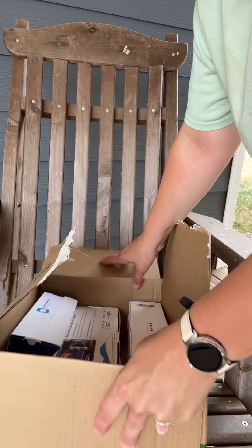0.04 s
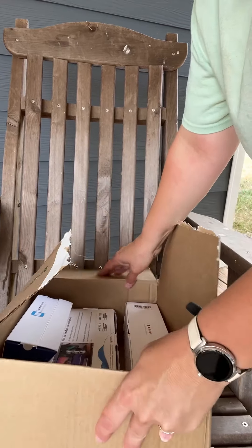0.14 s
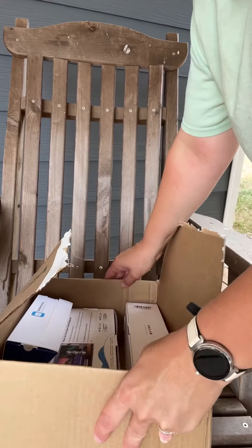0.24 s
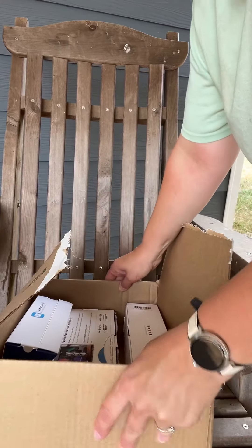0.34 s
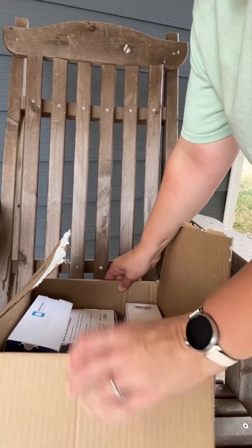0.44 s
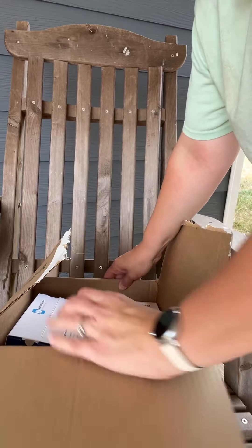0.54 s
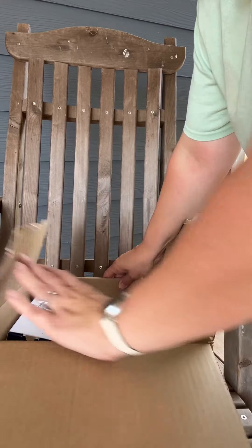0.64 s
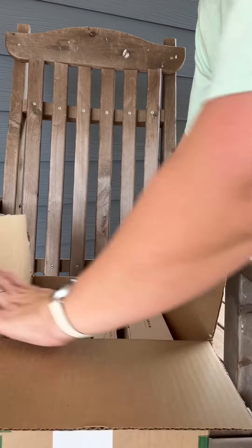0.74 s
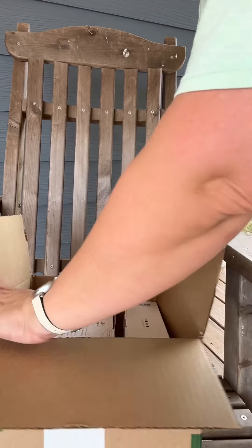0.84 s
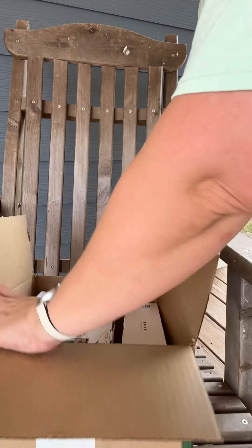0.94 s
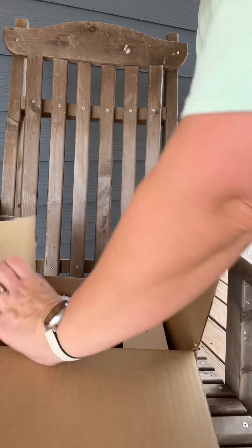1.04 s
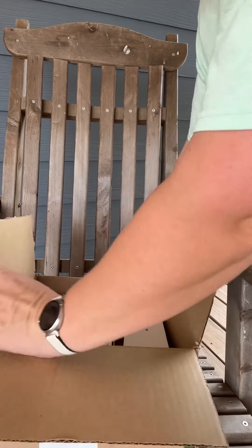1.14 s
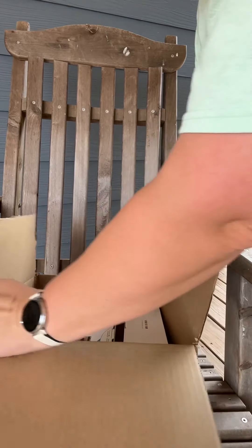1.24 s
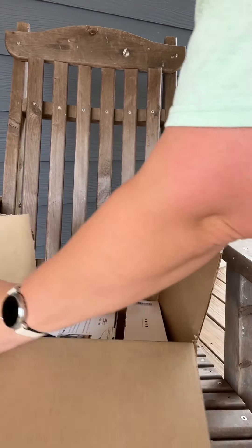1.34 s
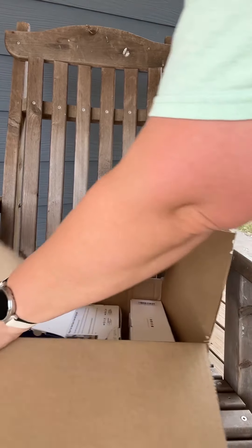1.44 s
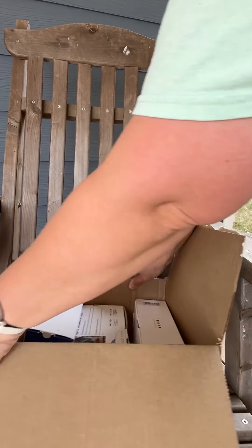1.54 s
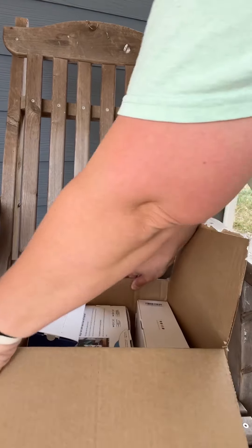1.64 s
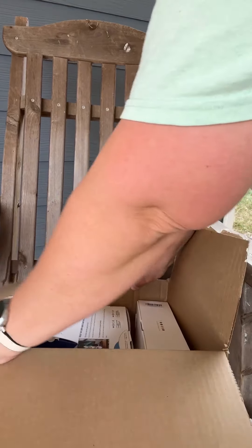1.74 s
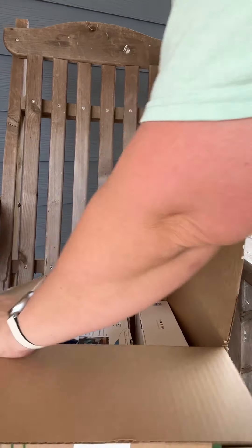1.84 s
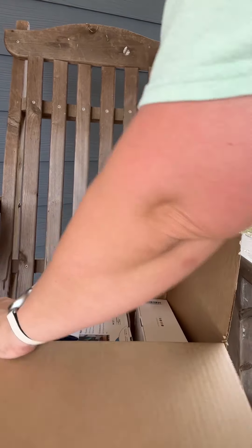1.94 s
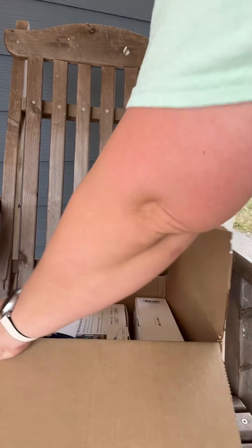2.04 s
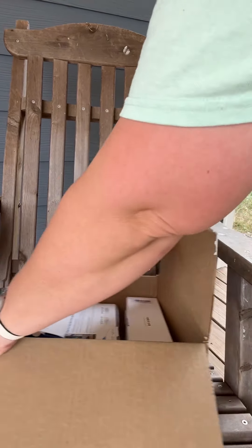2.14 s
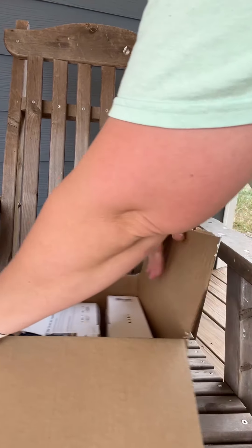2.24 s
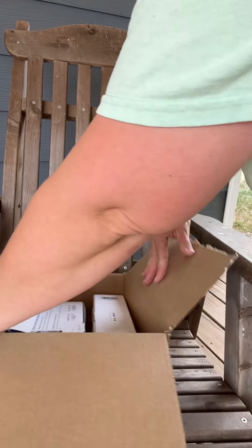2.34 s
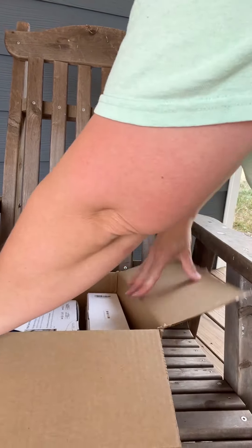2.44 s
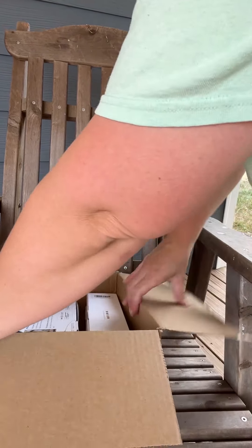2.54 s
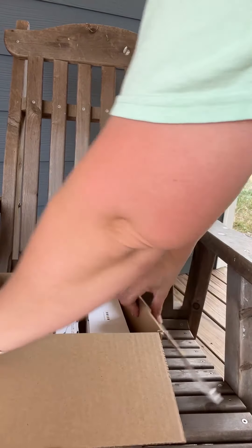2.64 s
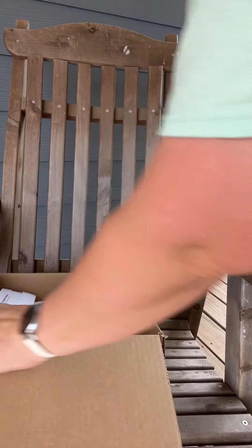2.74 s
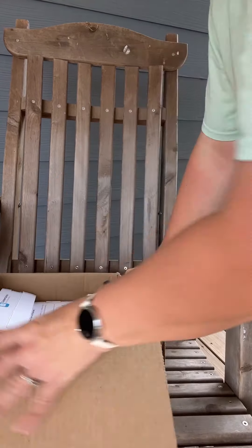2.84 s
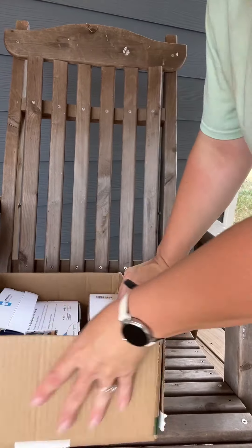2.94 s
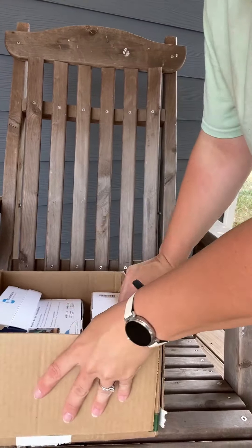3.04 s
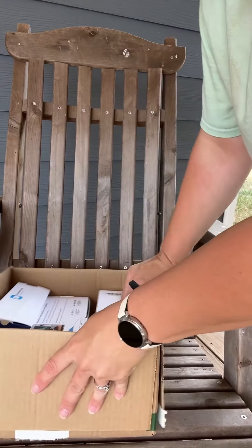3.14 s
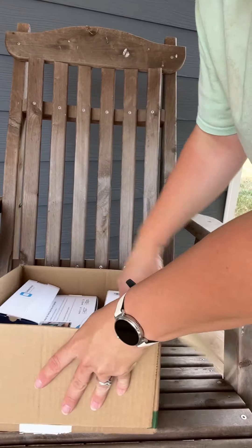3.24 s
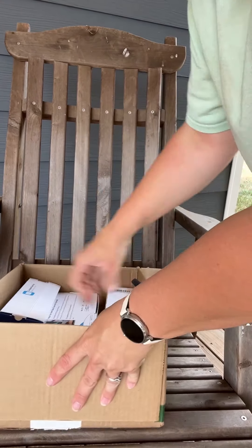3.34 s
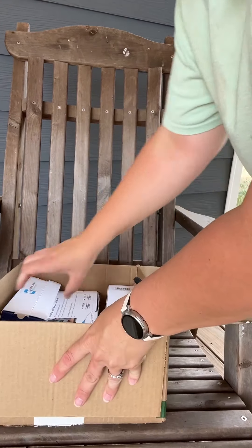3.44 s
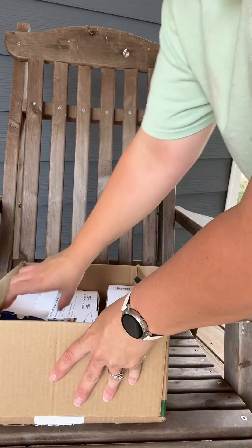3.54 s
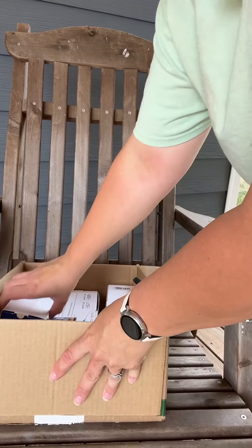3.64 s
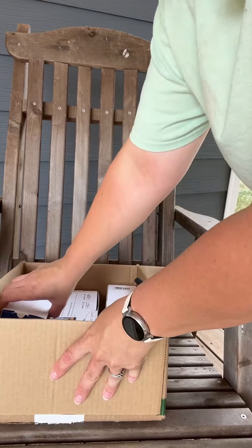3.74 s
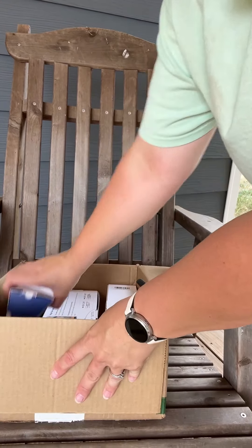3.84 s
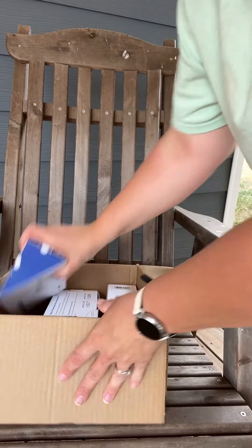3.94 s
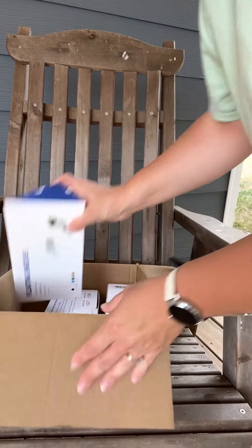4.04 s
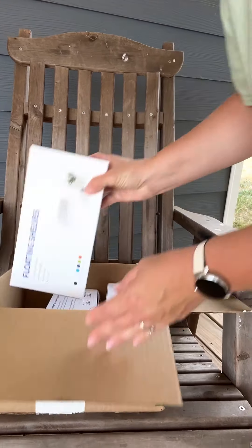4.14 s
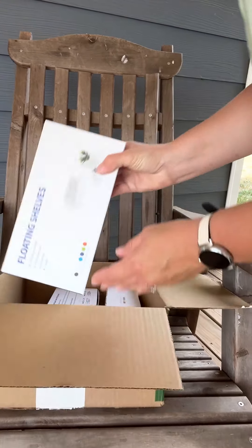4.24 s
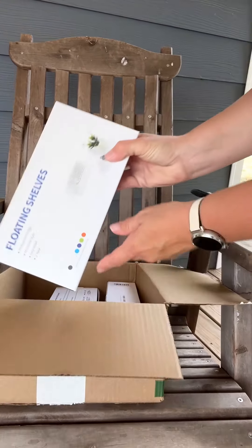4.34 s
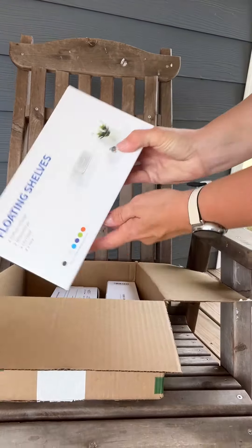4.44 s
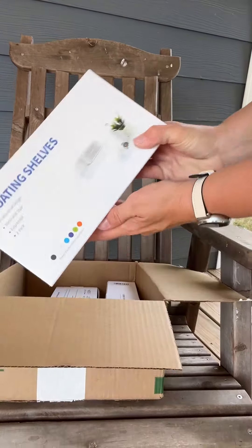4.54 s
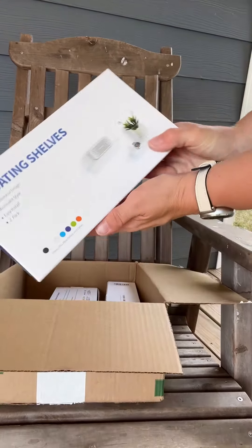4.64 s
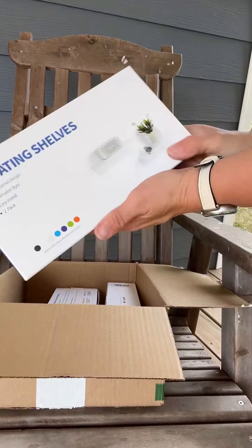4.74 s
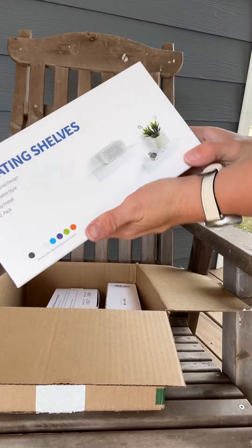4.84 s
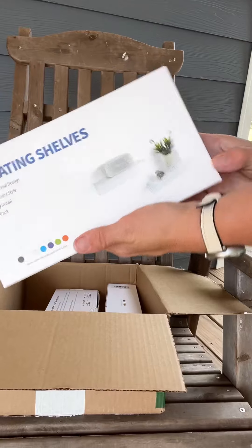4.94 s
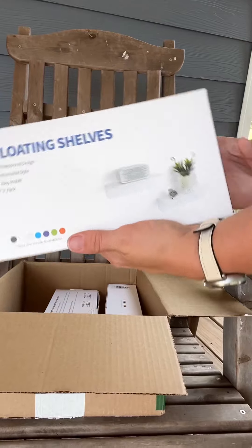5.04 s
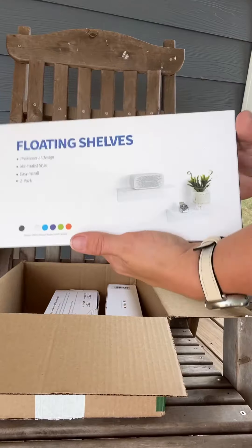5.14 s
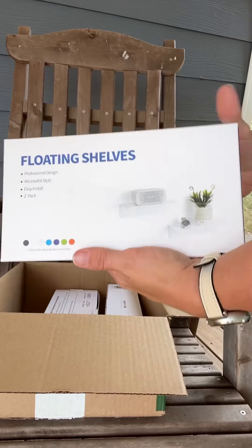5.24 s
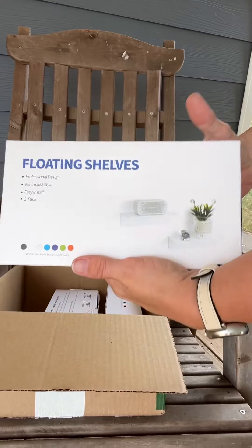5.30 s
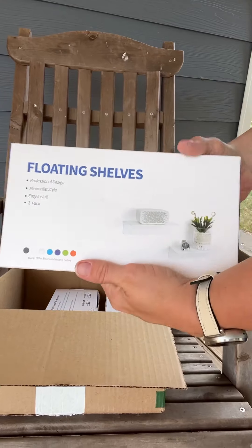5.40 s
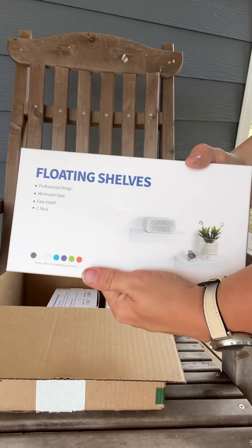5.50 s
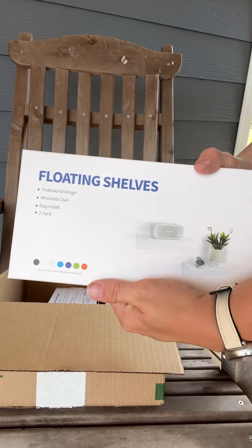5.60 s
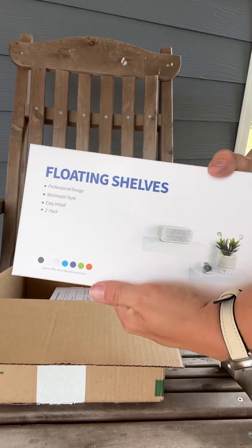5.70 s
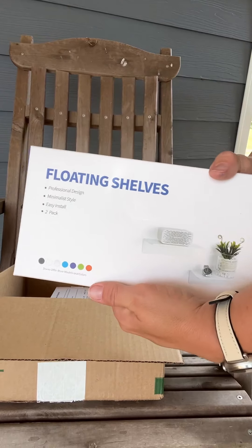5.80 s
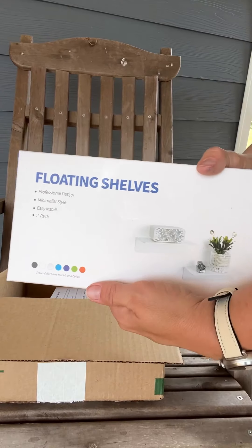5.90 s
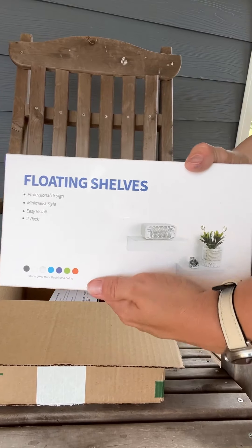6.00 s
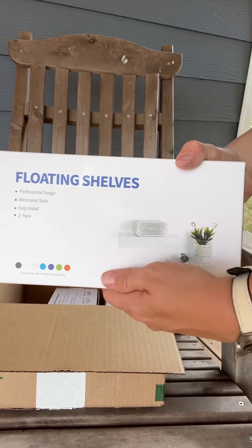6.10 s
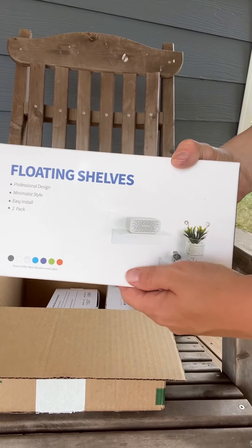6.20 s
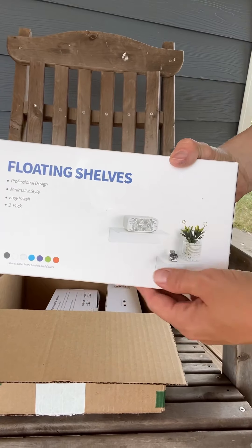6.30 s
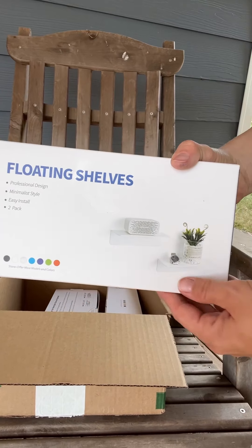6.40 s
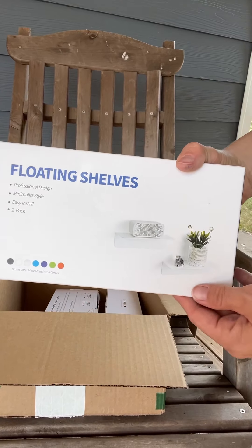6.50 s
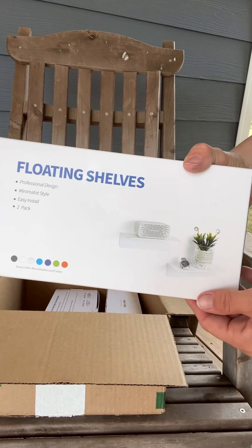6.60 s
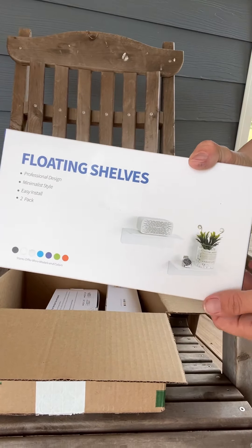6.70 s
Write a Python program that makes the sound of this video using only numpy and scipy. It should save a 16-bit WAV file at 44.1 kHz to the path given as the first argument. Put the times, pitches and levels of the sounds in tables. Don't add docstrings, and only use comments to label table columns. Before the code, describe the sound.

Hands open a cardboard box on a wooden chair outdoors, heard close in stereo. A flap creaks and knocks loudly at once, skin rubs the board, sharp snaps break through around one second, then hollow bumps and a brighter scrape near three. A smaller carton slides out with a few taps and a crisp knock, then only faint finger rubs over low distant hum.

```python
import sys
import numpy as np
from scipy import signal
from scipy.fft import rfft, irfft, next_fast_len
from scipy.io import wavfile
from scipy.ndimage import uniform_filter1d, map_coordinates

SR = 44100
rng = np.random.default_rng(int(sys.argv[2]) if len(sys.argv) > 2 else 0)


def how_loud(loudness_db):
    steps = np.asarray(loudness_db, float) / 20
    return 10 ** steps


def int16_out(signal):
    q = np.round(np.clip(np.atleast_2d(signal).T, -1, 1) * 32767)
    wavfile.write(sys.argv[1], SR, q.astype(np.int16))


N = 298116

# (frequency [Hz], density [dB per Hz])
TRAFFIC_COLOUR = [(18, -40), (38, 3.5), (55, -2.5), (130, -8), (200, -17), (500, -24), (1300, -41.5),
                  (2400, -43), (5500, -45), (8000, -40), (15000, -54)]
# (frequency [Hz], width [Hz], level [dB])
COMPRESSOR = [(52, 11, -0.5), (122, 12, -1.5)]
# (frequency [Hz], density [dB per Hz])
FIZZ_COLOUR = [(4500, -31.5), (6500, 3.5), (8000, 1), (11000, -0.5), (13500, -1.5), (15500, -4.5)]
SCRATCH_COLOUR = [(700, -40), (1400, -3), (2400, 0), (4000, -2), (5800, -3), (6900, -11), (8000, -25),
                  (10000, -55)]
# (peak time [s], rise [s], fall [s], fizz [dB], scratch [dB])
BOX_STROKES = [(.16, 0.93, 0.036, -48, -45.5), (.192, 0.067, 0.065, -39.5, -38.5),
               (.337, 0.0023, 0.03, -44, -35.5), (.438, 0.11, 0.12, -37, -38.5),
               (.58, 0.018, 0.12, -44, -43), (.86, 0.057, 0.16, -48, -48), (.975, 0.021, 0.04, -55, -49),
               (1.047, .008, 0.017, -50.5, -52.5), (1.16, 0.11, 0.12, -44, -59.5),
               (1.215, 0.035, 0.043, -58, -43.5), (1.315, 0.025, 0.014, -47, -68),
               (1.42, 0.15, 0.24, -52, -50), (1.583, 0.1, 0.16, -48.5, -47),
               (1.76, 0.024, 0.11, -42.5, -47), (1.797, 0.014, .03, -51, -43.5),
               (1.925, 0.17, 0.017, -49.5, -49.5), (2.02, .06, .15, -55, -53),
               (2.273, 0.24, .22, -45.5, -43), (2.585, 0.19, 0.3, -46.5, -51),
               (2.707, 0.087, 0.31, -41.5, -39.5), (2.878, .015, 0.082, -35.5, -38.5),
               (2.905, 0.033, 0.051, -36.5, -37), (2.955, 0.16, 0.02, -33.5, -36),
               (3.137, 0.13, 0.19, -48.5, -51), (3.227, 0.091, 0.032, -52.5, -44),
               (3.4, 0.37, 0.086, -53.5, -50.5)]
CARTON_STROKES = [(3.56, 0.026, 0.038, -82.5, -59.5), (3.673, 0.031, 0.088, -64, -51.5),
                  (3.771, 0.0054, 0.48, -63, -58.5), (3.926, 0.036, 0.17, -55, -57),
                  (4.096, 0.057, 0.052, -55, -52.5), (4.37, 0.15, 0.13, -76.5, -64.5),
                  (4.459, 0.092, 0.24, -65, -67.5), (4.712, 0.046, 0.36, -68, -67),
                  (4.938, 0.085, 0.032, -64, -67.5), (5.031, 0.086, 0.0202, -66.5, -70),
                  (5.14, 0.021, 0.037, -64.5, -68.5), (5.2, 0.059, 0.025, -64.5, -68),
                  (5.44, 0.16, 0.12, -69.5, -67), (5.626, 0.042, 0.019, -81.5, -77.5),
                  (5.75, 0.0496, 0.0594, -79.5, -70.5), (6.13, 0.19, 0.41, -57, -63.5),
                  (6.265, 0.05, 0.22, -51, -57), (6.6, 0.12, 0.0303, -75.5, -79.5)]
# (peak time [s], rise [s], fall [s], wall [dB], boom [dB])
PUSHES = [(.09, 0.099, 0.57, -47.5, -45), (.33, 0.0093, 0.13, -43.5, -42), (.475, 0.028, 0.069, -41.5, -41),
          (.66, 0.12, 0.09, -50, -48.5), (.93, 0.21, 0.26, -49, -52), (1.17, 0.016, 0.3, -53, -46.5),
          (1.32, 0.017, 0.021, -43.5, -38.5), (1.578, 0.37, 0.19, -49.5, -50.5),
          (1.888, 0.34, 0.12, -53, -51.5), (2.0, 0.055, 0.18, -49.5, -39.5), (2.25, 0.15, 0.16, -42, -42.5),
          (2.56, 0.37, 0.15, -55, -50.5), (2.76, 0.25, 0.12, -49.5, -74), (2.96, 0.29, 0.051, -41.5, -43),
          (3.31, 0.33, 0.17, -42.5, -49), (3.64, 0.41, 0.45, -64, -52.5), (3.96, 0.114, 0.069, -52, -45),
          (4.09, 0.084, 1, -64.5, -60.5), (4.36, 0.091, 0.21, -60, -53), (4.73, 0.059, 0.18, -70, -72),
          (5.16, 0.033, .1, -72, -75), (5.43, 0.17, 0.18, -70.5, -63), (5.78, 0.089, 0.27, -81, -65),
          (6.3, 0.48, 0.3, -69.5, -74)]
# (time [s], level [dB])
GRIP = [
    (0, -59),
    (3.43, -55.5),
    (3.5, -82),
    (3.6, -70.5),
    (5.03, -78.5),
    (5.06, -90.5),
    (6.76, -99),
]
# (frequency [Hz], width [Hz], level [dB])
WALL_MODES = [(687, 268, 2.5), (1050, 340, 3.5), (1450, 530, 1), (1820, 1400, -10.5)]
HOLLOW_MODES = [(151, 24.6, 2), (250.5, 24, 2.5), (306, 29, 0.5), (408, 83, -4.5)]
CHAIR_MODES = [(48.5, 16, 1.5), (114, 51, -3)]
# (time [s], peak [dB], pitch [Hz], swell [ms], left over right [dB])
THUMPS = [(.09, -32, 84, 8.6, -2), (0.204, -27, 90, 7.1, -2), (.342, -28, 107, 7.5, -3),
          (1.33, -24.5, 66.7, 9.5, -5.5), (1.929, -29, 90, 8.5, -3), (1.97, -33, 115, 19, 0),
          (2.233, -28, 102, 14.4, -6), (2.291, -32, 94, 8.5, -7), (2.972, -30, 108.6, 4.5, 10),
          (3.93, -34, 138, 3.9, -8), (4.899, -49, 74.2, 4.6, 1), (5.26, -61, 107.4, 8.3, -3),
          (5.752, -60, 73.2, 7.5, -1)]
FLAP_KNOCKS = [(0.341, -24, 188, 3, 0), (0.3374, -14.5, 378, 1.6, -3.5), (.338, -17.5, 623, 1.8, 6),
               (.341, -30, 236.5, 9.5, -4), (.351, -36, 291, 6.4, -2), (.506, -36, 310, 5.1, -7),
               (.568, -55, 454, 3.4, -7), (0.619, -26.5, 313, 4.3, -7.5), (0.618, -42, 171, 25, -18),
               (0.615, -33.5, 1002, 3, -3), (1.173, -27.5, 720, 4.2, 0), (1.1755, -30.5, 366, 9.7, 5),
               (1.179, -22.5, 168.6, 7.3, -10), (1.206, -27, 184, 15, -8), (1.23, -35.5, 704, 5, 4),
               (1.2343, -29, 152, 6.3, -10), (1.235, -23, 325, 2.5, 1), (1.317, -40, 174, 14, -13),
               (1.322, -32.5, 408, 4, 3), (1.9685, -40, 533, 9.2, -6), (1.9744, -31.5, 430, 3.5, -3),
               (1.984, -33, 158, 4.4, -16), (2.04, -39.5, 432, 3.2, -2), (2.219, -31, 250, 8, 1),
               (2.223, -22, 356, 3.7, 2), (2.2353, -22, 310, 2.1, -4), (2.244, -27, 234, 2.7, -13),
               (2.2606, -25.5, 251, 2.7, -1), (2.265, -37.5, 337, 9.3, 5), (2.287, -36, 253, 12, 0),
               (2.512, -37, 422, 4.2, -5), (2.5206, -31.5, 173, 7.2, -6), (2.54, -40.5, 420, 3.7, -6),
               (2.751, -27, 275, 3.6, -5), (2.774, -33, 264, 3.1, -4), (2.9708, -19.5, 833, 0.66, 5),
               (2.973, -28.5, 325, 1.9, 2), (3.304, -35, 258, 9, -7)]
CARTON_KNOCKS = [(3.546, -53, 320, 5.4, 0), (3.66, -44, 394, 9.9, -2), (3.666, -39, 168, 5.5, -4),
                 (3.67, -23.5, 313, 2.2, -3.5), (3.687, -36.5, 270, 4.5, -2), (3.803, -52, 292, 4, -5),
                 (3.879, -41.5, 171, 3.3, -13), (3.927, -31, 285, 4.6, -4), (3.931, -40.5, 420, 5.3, -7),
                 (3.944, -41.5, 293, 6.2, -1), (4.204, -43.5, 400, 3.3, -3), (4.3526, -35.5, 727, 1.8, -21),
                 (4.3546, -30, 368, 3.9, -1), (4.358, -37, 680, 1.3, -4), (4.3614, -39, 379, 5.6, -7),
                 (4.405, -41.5, 466, 2.3, -10)]
CATCHES = [(0.3373, -23.5, 1260, 0.85, -4), (0.477, -27, 1354, 1.2, 5), (.508, -39, 1020, 0.69, 2),
           (.778, -61, 1140, 2, -1), (.86, -41, 776, 3.1, 0), (0.994, -39, 990, 4.2, -2),
           (1.315, -37, 1540, 1.4, -3), (1.435, -38, 90, 4.9, -7), (1.635, -45, 1050, 2.7, 8),
           (1.7936, -44, 790, 2.8, -4), (1.81, -38.5, 150, 3, -7), (1.9682, -38, 1090, 3, -6),
           (2.233, -31.5, 1210, 2.4, -2), (2.873, -33.5, 1610, 1.5, -2), (2.9707, -26.5, 1210, 0.57, 2),
           (3.215, -38, 2200, 3, -2), (3.264, -39, 1050, 2.8, -2), (3.291, -36, 697, 3, 7),
           (3.335, -39, 1160, 1.8, 1), (3.649, -44.5, 900, 4.3, -2), (3.925, -47, 900, 4.7, 2),
           (3.946, -49, 1730, 4, -2), (4.208, -48, 563, 2.5, -2), (4.3523, -27, 1500, 0.6, -3),
           (5.175, -63, 700, 2.7, -5), (5.495, -63.5, 1350, 2, -3), (5.64, -67, 1450, 1.8, -3)]
JERKS = [(.122, -17.5, 729, 4.2, 4), (.138, -24, 735, 3.3, 6), (.175, -24, 716, 5.8, 8),
         (.185, -23, 713, 2.1, 1), (.196, -19, 710, 2, -3), (.192, -27, 970, 3.3, 0),
         (.641, -31, 280, 2.2, -6), (4.3527, -23.5, 1000, 0.45, -2), (.178, -24, 210, 8.6, -4),
         (5.752, -59.5, 650, 2.5, -8)]
# (time [s], level [dB])
FLAP_CREAKS = [
    [(0.1, -49.5), (0.12, -35), (0.127, -28.5), (0.15, -35)],
    [(0.158, -37.5), (0.175, -27), (0.196, -24.5), (0.206, -40), (0.228, -43), (0.25, -40)],
]
# (time [s], level [dB])
TAPE_SCRAPE = [(.935, -56.5), (.95, -45), (.985, -49), (.993, -48.5), (.998, -43), (1.012, -59.5),
               (1.035, -57), (1.046, -51.5), (1.06, -58.5)]
CARTON_SLIDE = [(3.86, -65), (3.924, -58), (3.985, -84), (4.01, -66.5), (4.07, -62), (4.098, -56),
                (4.13, -62), (4.15, -77)]
# (frequency [Hz], width [Hz], level [dB])
FLAP_MODES = [(246, 48, -6), (400, 26, -2.5), (612, 54, -8), (745, 21, 3.5), (985, 55, -5), (1309, 58, -9),
              (1480, 90, -13.5), (2200, 320, -15)]
FLUTE_MODES = [(1130, 100, 0), (1930, 320, -4), (2900, 220, -4.5), (3515, 370, -6.5)]
CARTON_MODES = [(1014, 83, 18), (1500, 45, -6), (2620, 750, -17)]
# (time [s], peak [dB], left over right [dB])
RAPS = [(.3362, -20, -4), (.568, -28, -3), (0.616, -26, -2), (1.174, -29, -13), (1.206, -27, -6),
        (1.317, -35, -1), (1.92, -32.5, -1), (1.967, -24.5, -4), (2.218, -24, 1), (2.235, -23, -3),
        (2.747, -24, 2), (2.9696, -22, -4), (3.547, -50, -2), (3.648, -33, -5), (3.803, -43, -2),
        (3.875, -39, 3), (3.926, -39, -2), (4.207, -48, -5), (4.228, -46.5, -2), (4.3518, -22.5, -2),
        (4.404, -44, -2), (5.26, -55, -9), (5.586, -65, -5), (5.753, -57, -8), (5.79, -61, -7)]
# (frequency [Hz], level [dB], t60 [s])
BOARD_TREND = [(500, -2.5, 0.069), (900, -1.5, 0.041), (1470, 0.5, 0.031), (2220, -8.5, 0.0089)]
# (time [s], peak [dB], dull part [dB])
SNAPS = [(0.3365, -36, 6.5), (0.5676, -46, -7), (0.986, -26.5, -24), (1.0415, -44.5, -9),
         (1.0986, -35.5, -18), (1.1699, -19.5, -14), (1.1738, -30, -2.5), (1.202, -15, -12.5),
         (1.2032, -10, -17.5), (1.23, -37, -11.5), (1.3, -53.5, -5), (1.315, -42, -3), (1.7467, -30, -15),
         (1.7514, -31, -16), (1.793, -45, 5.5), (1.9186, -44.5, 5), (2.504, -41, 0), (2.971, -38.5, 1),
         (3.5463, -58, 12.5), (0.996, -27.5, -9), (3.6484, -62.5, 13), (3.671, -49, 4.5),
         (3.768, -49.5, 0.5), (3.7994, -56, 0), (3.9284, -41, 0.5), (4.2408, -60, 0), (4.2723, -46, -6),
         (4.3343, -29.5, -10.5), (4.3465, -46, -8.5), (4.3526, -48, 10), (4.4055, -48, -5.5),
         (5.1292, -51, -23), (5.2611, -76, -2.5), (5.7526, -77, 3), (4.3402, -46, -6)]
# (time [s], pitch [Hz], level [dB])
PALM_SWEEP = [
    (.37, 2400, -64.5),
    (.39, 2250, -53),
    (.44, 1650, -44.5),
    (.478, 1348, -37),
    (.5, 1200, -40),
    (.525, 1100, -63),
]
# (frequency [Hz], left lead [half turns])
TREBLE_LEAD = [(5600, -1.3), (6900, -1.03), (8300, -.93), (9650, -.5), (10700, -.2), (11700, 0),
               (13800, .63), (14900, 1)]
# (time [s], share [dB])
STRAY_TREBLE = [(0, -11), (.42, -14.5), (.78, -13), (.85, -6.5), (1.7, -9), (2.4, -8), (2.52, -11.5),
                (2.84, -11), (2.9, -7), (4.45, -8), (5.9, -8), (6.02, -11), (6.45, -12.5), (6.6, -8.5)]
# (frequency [Hz], left lead [radians])
BODY_LEAD = [(420, 0.047), (720, 1.69), (1050, 0)]

HALVES = np.array([[.5], [-.5]])


def unit(x):
    return x / np.sqrt(np.mean(x ** 2) + 1e-20)


def along(points, hz):
    f, v = np.transpose(points)
    return np.interp(np.log(hz + 1), np.log(f + 1), v)


def curves(rows):
    s, *cols = np.transpose(rows)
    return [np.interp(np.arange(N) / SR, s, c, left=c[0], right=c[-1]) for c in cols]


def wobble(rate):
    knots = rng.standard_normal(int(N * rate / SR) + 4)
    return map_coordinates(knots, [np.arange(N) * rate / SR])


def filtered(x, response):
    m = next_fast_len(N + SR // 4)
    return irfft(rfft(x, m) * response(np.fft.rfftfreq(m, 1 / SR)), m)[..., :N]


def lead(radians):
    return np.exp(1j * HALVES * radians)


def resonant(peaks):
    def response(f):
        total = 0
        for k, (centre, width, db) in enumerate(peaks):
            damping = 1j * f * width
            total = total + (-1) ** k * how_loud(db) * damping / (centre * centre - f * f + damping)
        return total
    return response


def slips(response, rate, spread_db, alike, catch_db):
    hit = rng.random((2, N)) < rate / SR
    bunches = catch_db * (wobble(45) + wobble(140))
    size = how_loud(spread_db * rng.exponential(size=(2, N)) + bunches)
    a, b = hit * size * rng.standard_normal((2, N))
    turn = np.arccos(np.clip(alike, -1, 1)) / 2
    middle, side = np.cos(turn) * a, np.sin(turn) * b
    return unit(filtered(np.array([middle + side, middle - side]), response))


def strokes(rows):
    s, rise, fall, *cols = np.transpose(rows)[:, :, None]
    t = np.arange(0, N, 32) / SR
    triangle = np.clip(np.minimum(1 + (t - s) / rise, 1 - (t - s) / fall), 0, 1)
    swell = triangle ** (2 * 1.093)
    return [np.interp(np.arange(N) / SR, t, np.sum(how_loud(2 * db) * swell, axis=0)) for db in cols]


def held(power, over_db):
    return 10 * np.log10(power + how_loud(2 * (curves(GRIP)[0] + over_db)))


def traffic():
    road = slips(lambda hz: how_loud(along(TRAFFIC_COLOUR, hz)), rate=51000, spread_db=-1.5, alike=0.68, catch_db=1.0)
    return how_loud(-59.5 + 0.71 * wobble(1.8) + [[-1.5], [2.2]]) * road


def hum():
    body = resonant(COMPRESSOR)
    lines = slips(lambda hz: body(hz) ** 2, rate=2000, spread_db=0, alike=1.0, catch_db=0)
    return how_loud(-64 + np.array([[-2], [2]])) * lines


def drag():
    fizz_power, scratch_power = strokes(BOX_STROKES + CARTON_STROKES)
    fizz_db, scratch_db = held(fizz_power, 0), held(scratch_power, 1)
    port_lag = .00007

    def grit(hz):
        return how_loud(along(SCRATCH_COLOUR, hz)) * lead(2 * np.pi * hz * port_lag)

    fizz = slips(lambda hz: how_loud(along(FIZZ_COLOUR, hz)), rate=27000, spread_db=1.5, alike=0.94, catch_db=1.1)
    coarse = slips(grit, rate=14000, spread_db=1.9, alike=.5, catch_db=.5)
    fine = unit(filtered(coarse, resonant([(5400, 3400, 0)])))
    thin = filtered(fizz, lambda hz: 1 / (1 + (7700 / (hz + 1)) ** 10))
    smooth = np.clip((fizz_db - scratch_db + 3.5) / 11, 0, 1)
    hiss = fizz + smooth ** 2 * (thin - fizz)
    rasp = (1 - smooth) * coarse + smooth * fine
    return how_loud(fizz_db + 6.0) * hiss, how_loud(scratch_db + [[1.2], [4]]) * rasp


def aftershake():
    s, db = np.transpose(THUMPS + FLAP_KNOCKS + CARTON_KNOCKS)[:2, :, None]
    t = np.arange(0, N, 64) / SR
    t60_s = 0.077
    tail_db = -41 + 0.95 * (db + 25.5) - 60 * np.abs(t - s) / t60_s
    tail = (t > s) * how_loud(2 * tail_db)
    return np.interp(np.arange(N) / SR, t, tail.sum(axis=0))


def shake():
    bend, hollow = strokes(PUSHES)
    after = aftershake()
    push_db, after_db, idle_db = -6, 0, -66.5
    chair_power = how_loud(2 * push_db) * hollow + how_loud(2 * after_db) * after + how_loud(2 * idle_db)
    wall_db, boom_db, chair_db = held(bend, -3), held(hollow + after, 0.5), held(chair_power, 3)
    wall = slips(resonant(WALL_MODES), rate=5600, spread_db=0.75, alike=0.48, catch_db=0.8)
    boom = slips(resonant(HOLLOW_MODES), rate=1500, spread_db=1.4, alike=.75, catch_db=.9)
    chair = slips(resonant(CHAIR_MODES), rate=900, spread_db=1.4, alike=.75, catch_db=.6)
    box = how_loud(wall_db + [[.6], [2.4]]) * wall + how_loud(boom_db + [[-1.6], [1.6]]) * boom
    return box + how_loud(chair_db + [[-.6], [2.7]]) * chair


def knocks(rows):
    out, t = np.zeros((2, N + SR)), np.arange(SR // 7) / SR
    for s, db, hz, swell_ms, pan_db in rows:
        u = t / (swell_ms / 1000)
        phase = 0.4 * rng.standard_normal((2, 1))
        blow = u * np.exp(1 - u) * np.sin(2 * np.pi * hz * t + phase)
        start = round(s * SR)
        out[:, start:start + len(t)] += how_loud(db + pan_db * HALVES) * blow
    return out[:, :N]


def creak(rows, body, pan_db):
    t = np.arange(N) / SR
    sliding = (t > rows[0][0]) & (t < rows[-1][0])
    jerky = slips(resonant(body), rate=3700, spread_db=1.0, alike=0.53, catch_db=1.5)
    return sliding * how_loud(curves(rows)[0] + 5.0 + pan_db * HALVES) * jerky


def raps():
    out, t = np.zeros((2, N + SR)), np.arange(SR // 10) / SR
    trend_hz, trend_db, trend_t60 = np.transpose(BOARD_TREND)
    for s, db, pan_db in RAPS:
        modes = np.geomspace(560, 2100, num=9)[:, None] * rng.uniform(0.91, 1.146, size=(9, 1))
        mode_db = np.interp(modes, trend_hz, trend_db)
        t60 = np.interp(modes, trend_hz, trend_t60)
        fade = how_loud(mode_db - 60 * t / t60) * (1 - np.exp(-t * modes / 0.31))
        phase = .35 * rng.standard_normal((2, 9, 1))
        ring = np.sum(fade * np.sin(2 * np.pi * modes * t + phase), axis=1)
        start = round(s * SR)
        out[:, start:start + len(t)] += how_loud(db - 10.5 + pan_db * HALVES) * ring
    return filtered(out[:, :N], lambda hz: np.exp(-2j * np.pi * .07 * (2 * np.sqrt(hz) - hz / 45)))


def snaps():
    bright, dull = np.zeros((2, N + SR)), np.zeros((2, N + SR))
    t = np.arange(SR // 10) / SR
    shape = how_loud(2 - 60 * t / .006) + how_loud(-15 - 60 * t / .04)
    for s, db, dull_db in SNAPS:
        at = slice(round(s * SR), round(s * SR) + len(t))
        bright[:, at] += how_loud(db - 2.0) * shape * rng.standard_normal(len(t))
        burst = rng.standard_normal(len(t)) + 0.23 * rng.standard_normal((2, len(t)))
        dull[:, at] += how_loud(db + dull_db + 5.5) * shape * burst
    thin = resonant([(11500, 6500, 0.00047)])
    crack = filtered(bright[:, :N], lambda hz: thin(hz) ** 2)
    return crack + filtered(dull[:, :N], resonant([(2800, 3700, 0.0037)]))


def sweep():
    hz, db = curves(PALM_SWEEP)
    t = np.arange(N) / SR
    width_hz = 250
    rough = filtered(rng.standard_normal((2, N)), lambda f: 1 / (1 + (f / width_hz) ** 2))
    turn = 2 * np.pi * np.cumsum(hz) / SR
    tone = unit(rough[0] * np.cos(turn) + rough[1] * np.sin(turn))
    rubbing = (t > PALM_SWEEP[0][0]) * (t < PALM_SWEEP[-1][0])
    return rubbing * how_loud(db + 1.5 * wobble(90) + [[-1.2], [1.2]]) * tone


def patchy(x, depth_db):
    z = signal.stft(x, nperseg=512)[2]
    field = uniform_filter1d(rng.standard_normal(z.shape[1:]), size=5, axis=0)
    field = uniform_filter1d(field, size=13, axis=1)
    return signal.istft(z * how_loud(depth_db * unit(field)), nperseg=512)[1][:, :N]


def ports(x):
    def treble(hz):
        return 1 / (1 + (6655 / (hz + 1)) ** 24)

    late = np.array([np.roll(x[0], shift=190), np.roll(x[0], shift=330)])
    stray = how_loud(curves(STRAY_TREBLE)[0] + 4.0 * wobble(16)) * late
    below = filtered(x, lambda hz: 1 - treble(hz))
    direct = filtered(x[0], lambda hz: treble(hz) * lead(np.pi * along(TREBLE_LEAD, hz)))
    return below + direct + filtered(stray, treble)


def scene():
    fizz, scratch = drag()
    edges = creak(np.vstack(FLAP_CREAKS), FLAP_MODES, pan_db=-1.5)
    edges = edges + creak(TAPE_SCRAPE, FLUTE_MODES, pan_db=-3.0)
    edges = edges + creak(CARTON_SLIDE, CARTON_MODES, pan_db=1.0)
    cracks = snaps()
    blows = knocks(THUMPS + FLAP_KNOCKS + CARTON_KNOCKS + CATCHES + JERKS) + raps()
    handling = patchy(scratch + shake(), depth_db=1.65)
    rubbing = ports(handling + fizz + 0.55 * cracks + traffic())
    return edges + blows + 0.77 * cracks + rubbing + sweep() + hum()


def band_limit(x):
    return signal.sosfilt(signal.butter(12, 16510, fs=SR, output="sos"), x)


def record(dry):
    def microphones(hz):
        low_cut = (1j * hz / (1j * hz + 41)) ** 2
        return low_cut * (hz < 15980) * lead(along(BODY_LEAD, hz))

    mix = filtered(dry, microphones)
    return band_limit(mix)


dry = scene()
out = record(dry)
int16_out(out)
```